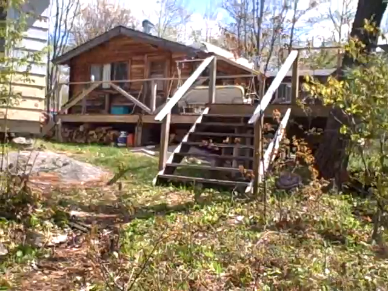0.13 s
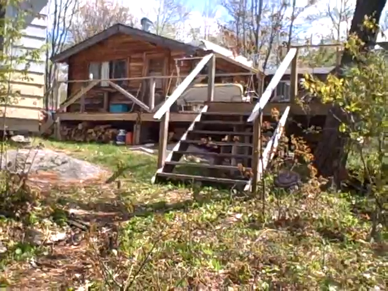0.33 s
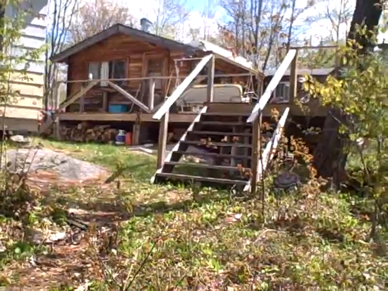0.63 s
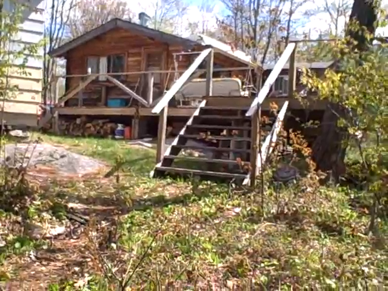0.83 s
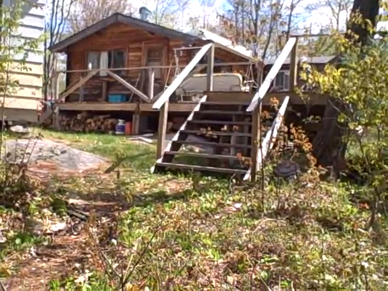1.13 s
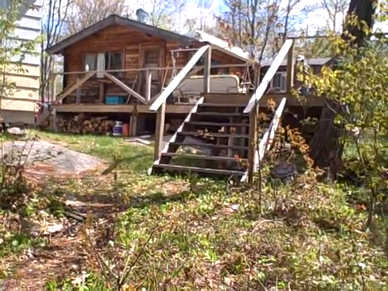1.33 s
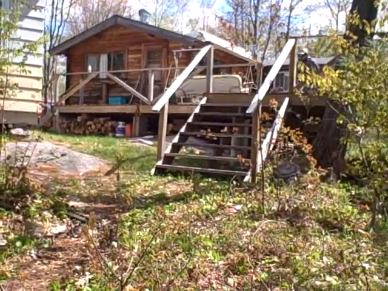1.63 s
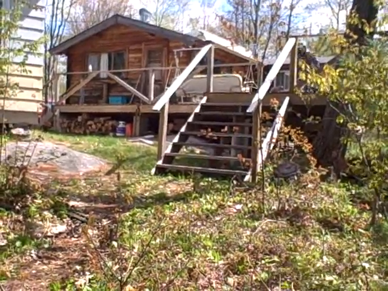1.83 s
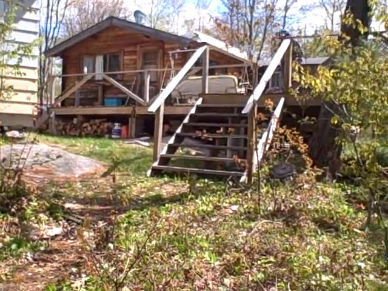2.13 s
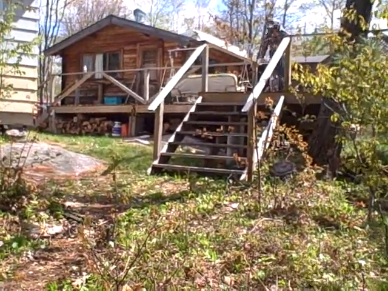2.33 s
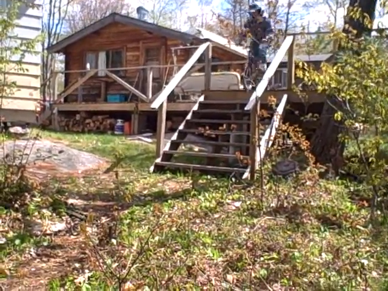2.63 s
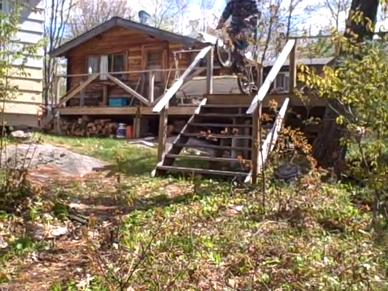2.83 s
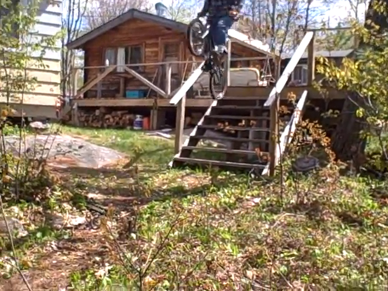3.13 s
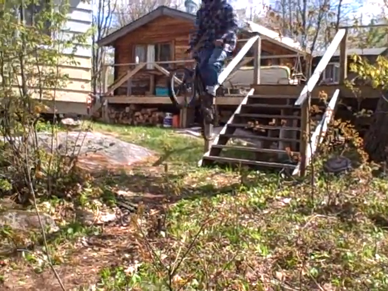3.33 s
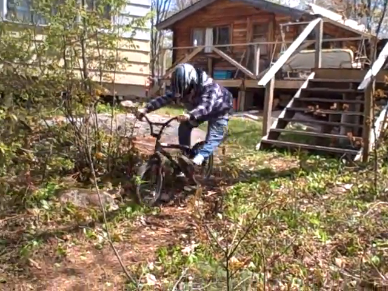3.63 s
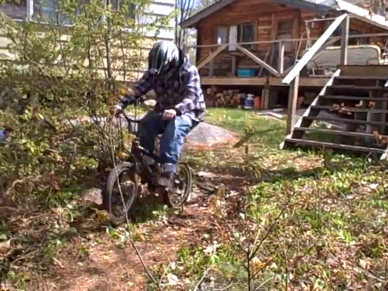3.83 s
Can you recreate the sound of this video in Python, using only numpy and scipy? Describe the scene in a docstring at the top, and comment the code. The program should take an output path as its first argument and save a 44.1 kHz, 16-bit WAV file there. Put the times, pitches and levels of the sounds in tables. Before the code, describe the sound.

A small bicycle rolls over a wooden deck some way off with hollow knocks. Its freewheel whirs briefly in the air, then it lands close by, chain clacking, and crunches through dry leaves. Light wind buffets the microphone outdoors.

```python
"""Outdoors, a wooden deck among trees. Wind buffets the microphone over rustling foliage and far birds.
A small bicycle rolls over the deck, its wheels knocking the boards into ringing, and jumps down the steps.
In the air its freewheel whirs with fast pawl ticks. Both tyres thump into dry leaves, the chain clacks
on the frame, and it rolls on, crunching. The yard returns short, dull echoes."""
import sys
import numpy as np
from scipy import signal
from scipy.fft import rfft, irfft, next_fast_len
from scipy.io import wavfile
from scipy.ndimage import uniform_filter1d

SR = 44100
rng = np.random.default_rng(int(sys.argv[2]) if len(sys.argv) > 2 else 0)


def wrap_up_sound(samples):
    """Save the sound to the file named by the first command line argument, as 16-bit audio."""
    columns = np.atleast_2d(samples).T
    # keep every value between -1 and 1, then stretch to whole-number steps
    tamed = np.clip(columns, -1, 1)
    steps = np.round(tamed * 32767).astype(np.int16)
    wavfile.write(sys.argv[1], SR, steps)


N = 176400
T = np.arange(N) / SR
EVENT_T = T[:SR // 2]


def amp(db):
    """Decibels to gain."""
    return 10 ** (np.asarray(db) / 20)


def unit(x):
    """Scale to rms 1."""
    return x / np.sqrt(np.mean(x ** 2) + 1e-20)


def level(points):
    """Gain curve from (time [s], level [dB]) points."""
    return amp(np.interp(T, *np.transpose(points)))


def add(mix, start_s, sound):
    """Mix a sound in at start_s."""
    part = mix[round(start_s * SR):][:len(sound)]
    part += sound[:len(part)]


def colour(x, spectrum, dull_db_oct=0):
    """Filter by a spectrum and a downward tilt; rms 1."""
    size = next_fast_len(len(x) + 4096)
    octave = np.log2(np.fft.rfftfreq(size, 1 / SR) + 1)
    hz, db = np.transpose(spectrum)
    tilt_db = dull_db_oct * np.maximum(octave, np.log2(hz[0]))
    gain = amp(np.interp(octave, np.log2(hz), db) - tilt_db)
    return unit(irfft(rfft(x, size) * gain / gain.max(), size)[:len(x)])


def hump(hz):
    """Spectrum of one broad resonance."""
    return [(hz / 10, -35), (hz / 2, -10), (hz, 0), (hz * 2, -16), (hz * 10, -50)]


def decay(t60_s):
    """Envelope falling 60 dB in t60_s."""
    return np.exp(-np.log(1000) * EVENT_T / t60_s)


def attack(rise_s):
    """Envelope rising to 1 with time constant rise_s."""
    return 1 - np.exp(-EVENT_T / rise_s)


def burst(spectrum, t60_s, dull_db_oct=0, rise_s=0.0003):
    """Coloured noise, fast rise, exponential decay."""
    noise = colour(rng.standard_normal(len(EVENT_T)), spectrum, dull_db_oct)
    return noise * attack(rise_s) * decay(t60_s)


def ring(modes, dull_db_oct=0):
    """Damped modes of alternating sign, tilted about the median frequency."""
    centre_hz = np.median([mode[0] for mode in modes])
    out = np.zeros(len(EVENT_T))
    for k, (hz, db, t60_s) in enumerate(modes):
        gain = (-1) ** k * amp(db - dull_db_oct * np.log2(hz / centre_hz))
        out += gain * decay(t60_s) * np.sin(2 * np.pi * hz * EVENT_T)
    return out


def flutter(samples, depth_db):
    """Random gain wandering over about the given number of samples."""
    drift = uniform_filter1d(uniform_filter1d(rng.standard_normal(N), samples), samples)
    return amp(depth_db * unit(drift))


def crackle(per_s, spread_db):
    """Random tiny snaps, a few larger than the rest; rms 1."""
    sizes = amp(spread_db * np.minimum(rng.exponential(1, N), 4))
    signs = rng.choice([-1, 1], N)
    return unit(sizes * signs * (rng.random(N) < per_s / SR))


# tree wash spectrum (frequency [Hz], level [dB])
TREE_SPECTRUM = [(59, -39), (100, 0.5), (163, -6.5), (266, -1), (350, -4), (433, -4.5), (492, -4.5),
                 (721, -2.5), (2470, -15), (6560, -23), (16000, -27.5)]


def trees():
    """Breeze in the trees: a soft, nearly steady wash."""
    return amp(-57.5) * colour(rng.standard_normal(N), TREE_SPECTRUM) * flutter(2500, depth_db=0.5)


# turbulence envelope (time [s], level [dB])
WIND_ENVELOPE = [(0, -46), (.27, -52.5), (.35, -43.5), (.58, -59), (1.03, -54), (1.25, -48), (1.34, -25),
                 (1.46, -45.5), (1.6, -45), (1.69, -31), (1.8, -40), (2.03, -41), (2.22, -47.5),
                 (2.58, -44.5), (2.8, -37.5), (2.92, -45), (3.03, -44), (3.14, -45), (3.22, -42.5),
                 (3.4, -46.5), (3.5, -37), (3.62, -44.5), (3.93, -39), (4, -36.5)]
# turbulence spectrum (frequency [Hz], level [dB])
WIND_SPECTRUM = [(10, -5.5), (30, 1.5), (55, -3.5), (110, -11), (180, -20), (300, -33.5), (700, -41.5),
                 (3000, -92)]
# single buffets (time [s], peak [dB], centre [Hz])
WIND_BUFFETS = [(0.339, -37.5, 101), (1.292, -39, 71), (1.32, -30, 76.6), (1.338, -34, 162),
                (1.35, -43, 61.3), (1.371, -32, 104), (1.4, -33, 154), (1.68, -37.5, 55),
                (1.6956, -26.5, 247), (1.714, -43, 51.4), (1.827, -35.5, 116), (2.545, -34.5, 49.7),
                (2.609, -35.5, 95), (2.769, -32, 121), (2.812, -30, 75), (3.515, -29, 50),
                (3.901, -30.5, 129), (3.93, -24, 73.6)]


def wind():
    """Low turbulence at the microphone, with single push-pull pressure pulses."""
    out = level(WIND_ENVELOPE) * colour(rng.standard_normal(N), WIND_SPECTRUM)
    lead_s = 0.05
    for time_s, db, hz in WIND_BUFFETS:
        phase = 2 * np.pi * hz * (T[:SR // 10] - lead_s)
        pulse = -phase * np.exp((1 - phase ** 2) / 2)
        add(out, time_s - lead_s, amp(db) * pulse)
    return out


# rustle envelope (time [s], level [dB])
RUSTLE_ENVELOPE = [(0, -70), (.25, -69), (.45, -76), (.56, -68), (.76, -60), (.95, -65.5), (1.1, -64),
                   (1.35, -70), (1.7, -76), (2.2, -67), (2.8, -67.5), (3.1, -74), (4, -73)]
# rustle spectrum (frequency [Hz], level [dB])
RUSTLE_SPECTRUM = [(300, -13), (1200, 11.5), (1900, 2.5), (3000, -2), (5500, -0.5), (9000, -9.5),
                   (16000, -6)]
# dry leaves stirring nearby (time [s], level [dB], t60 [s], centre [Hz])
LEAF_STIRS = [(.1, -61, 0.055, 11000), (.345, -60, 0.28, 1280), (.453, -50, 0.048, 1240),
              (.69, -67, .15, 11000), (1.29, -56, .025, 11800), (1.302, -61, .02, 9000),
              (1.438, -69, .03, 14000), (1.483, -61, 0.088, 11500), (1.904, -52, 0.043, 7100),
              (2.036, -59.5, 0.09, 11000), (3.44, -55, 0.055, 6500), (3.463, -52, .04, 7200)]


def foliage():
    """Leaves brush and tick together as the breeze swells; single dry ones stir nearby."""
    friction = crackle(per_s=900, spread_db=4) + 1.6 * rng.standard_normal(N)
    out = level(RUSTLE_ENVELOPE) * colour(friction * flutter(500, depth_db=2), RUSTLE_SPECTRUM)
    for time_s, db, t60_s, hz in LEAF_STIRS:
        add(out, time_s, amp(db) * burst(hump(hz), t60_s, rise_s=0.00051))
    return out


# far calls (time [s], length [s], pitch [Hz], level [dB])
BIRD_CALLS = [(0.743, 0.097, 6500, -71), (.75, 0.05, 2920, -64), (0.864, 0.061, 6500, -66.5),
              (.87, .05, 2830, -65), (1.36, 0.09, 5900, -74)]


def birds():
    """Faint far calls, blurred by echoes into narrow bands of noise."""
    out, t = np.zeros(N), T[:SR // 4]
    half_width_hz = 220
    for time_s, length_s, hz, db in BIRD_CALLS:
        band = [(hz / 2, -60), (hz - half_width_hz, -14), (hz, 0),
                (hz + half_width_hz, -14), (hz * 2, -60)]
        arch = np.sin(np.pi * np.minimum(t / length_s, 1))
        add(out, time_s, amp(db) * arch * colour(rng.standard_normal(len(t)), band))
    return out


# tyre rumble envelope (time [s], level [dB])
ROLL_ENVELOPE = [(0, -73), (1.65, -70), (1.88, -49), (2.03, -52), (2.17, -57.5), (2.28, -52.5), (2.42, -49),
                 (2.55, -58), (2.8, -53), (3, -71), (3.3, -96)]
# loose board spectrum (frequency [Hz], level [dB])
BOARD_SPECTRUM = [(100, -1), (230, -0.5), (330, 1), (480, -4), (700, -7.5), (1100, -14.5), (1500, -23),
                  (3000, -37), (8000, -58), (16000, -74)]
# wheel knocks (time [s], gain [dB], dullness [dB/octave])
WHEEL_KNOCKS = [(1.831, -24, 7.5), (1.915, -15, -1), (1.986, -13.5, 7), (2.018, -23, 17.5),
                (2.2975, 0, 0.5), (2.309, -5.5, -3.5), (2.345, -7.5, 5.5), (2.386, -12.5, -0.5),
                (2.465, -26, 13.5), (2.648, -19.5, 7.5), (2.76, -20, 4)]
# deck modes (frequency [Hz], level re knock [dB], t60 [s])
DECK_MODES = [(238.4, -42, 0.34), (300.6, -32.5, 0.31), (349.5, -36, .22), (363, -38.5, 0.32),
              (425, -40, 0.15), (567, -36, 0.13), (610, -40, 0.12), (686.5, -30, 0.079), (780, -38, 0.1),
              (954, -42, 0.078), (1080, -39, .1), (1700, -43, 0.072)]


def deck():
    """Tyres rumble over the deck; each knock rings its modes and clatters loose boards."""
    out = level(ROLL_ENVELOPE) * colour(rng.standard_normal(N), BOARD_SPECTRUM)
    out *= flutter(700, depth_db=-2)
    rise_s = 0.0008
    for time_s, db, dull_db_oct in WHEEL_KNOCKS:
        wood = ring(DECK_MODES, dull_db_oct) * attack(rise_s)
        clatter = burst(BOARD_SPECTRUM, t60_s=0.23, dull_db_oct=dull_db_oct, rise_s=rise_s)
        add(out, time_s, amp(db) * (wood + amp(-33.5) * clatter))
    return out


# distant bicycle clanks (time [s], level [dB], t60 [s], dullness [dB/octave])
BICYCLE_CLANKS = [(1.904, -49.5, 0.22, 6), (2.035, -58, 0.12, -8), (2.302, -54.5, 0.12, 2),
                  (2.646, -44.5, .22, 1), (2.769, -55, 0.11, -4.5), (2.833, -53, 0.082, -9)]
# clank spectrum (frequency [Hz], level [dB])
CLANK_SPECTRUM = [(200, -35), (600, -8), (1000, 1.5), (1400, -3), (2000, 0.5), (3500, -4.5), (6000, -8.5),
                  (9000, -21), (16000, -20)]


def clanks():
    """The bicycle clanks as it crosses the deck."""
    out = np.zeros(N)
    for time_s, db, t60_s, dull_db_oct in BICYCLE_CLANKS:
        add(out, time_s, amp(db) * burst(CLANK_SPECTRUM, t60_s, dull_db_oct, rise_s=0.00032))
    return out


# freewheel envelope (time [s], level [dB])
WHIR_ENVELOPE = [(3.1, -81), (3.18, -61.5), (3.27, -52), (3.35, -55.5), (3.47, -50.5), (3.54, -55),
                 (4, -66)]
# freewheel spectrum (frequency [Hz], level [dB])
WHIR_SPECTRUM = [(400, -18), (1500, -6), (3000, -5), (4400, 1), (7000, 0.5), (10000, 0), (13000, 2),
                 (15300, 7.5), (16000, -4.5)]


def freewheel():
    """Fast, uneven pawl ticks blur with the hiss of spinning wheels."""
    pawl_hz = 443 * flutter(200, depth_db=3.5)
    teeth_passed = np.floor(np.cumsum(pawl_hz) / SR)
    ticks = np.diff(teeth_passed, prepend=0) * rng.exponential(1, N)
    return level(WHIR_ENVELOPE) * colour(0.5 * unit(ticks) + rng.standard_normal(N), WHIR_SPECTRUM)


# chain and frame clacks (time [s], level [dB], t60 [s], dullness [dB/octave])
CHAIN_CLACKS = [(3.4997, -37.5, 0.0095, -2), (3.5275, -29.5, 0.011, -9), (3.622, -25.5, 0.0059, 7),
                (3.678, -29, 0.0086, 5), (3.7282, -12.5, 0.0097, -0.5), (3.7315, -22, 0.016, -2.5),
                (3.742, -21, 0.0078, -1.5), (3.774, -29, 0.0049, 0), (3.786, -37, .008, -9),
                (3.82, -24, 0.0047, 0), (3.8876, -28.5, 0.0095, 6)]
# clack spectrum (frequency [Hz], level [dB])
CLACK_SPECTRUM = [(300, -35), (800, 4), (1250, -10), (1620, 11.5), (1900, -11), (2700, 4.5), (3500, -3),
                  (5500, 3), (7200, 4.5), (9500, 1.5), (12700, 2), (15500, 6), (17000, -3)]
# frame modes (frequency [Hz], level re clack [dB], t60 [s])
FRAME_MODES = [(1630, -28, 0.033), (2110, -23, 0.024), (2700, -34, 0.046), (4965, -29, 0.11),
               (7070, -25, .15)]


def chain_slap():
    """Chain and fittings slap the frame, which rings briefly."""
    out = np.zeros(N)
    for time_s, db, t60_s, dull_db_oct in CHAIN_CLACKS:
        slap = burst(CLACK_SPECTRUM, t60_s, dull_db_oct, rise_s=0.00015)
        add(out, time_s, amp(db) * (slap + ring(FRAME_MODES)))
    return out


# tyre impacts (time [s], thump [dB], pitch [Hz], t60 [s], rise [s], dirt [dB], dirt t60 [s])
TYRE_IMPACTS = [(3.5551, -23.5, 136.4, 0.061, 0.0032, -32.5, 0.14),
                (3.6212, -22, 194, 0.021, 0.014, -28.5, 0.091)]
# dirt spray spectrum (frequency [Hz], level [dB])
DIRT_SPECTRUM = [(80, -7), (300, 7), (500, -4), (750, 4), (1200, -5), (2700, -4), (4000, -7.5),
                 (7500, -6.5), (11000, -12), (16000, -13.5)]
# bumps over the ground (time [s], level [dB], t60 [s], centre [Hz])
GROUND_BUMPS = [(3.625, -22, 0.037, 250), (3.667, -38, 0.03, 740), (3.768, -40, 0.11, 443),
                (3.821, -36, 0.03, 770), (3.859, -44, .05, 220), (3.885, -42, 0.045, 644),
                (3.896, -36, 0.16, 140), (3.992, -37.5, .1, 940)]


def landing():
    """Each tyre thumps down and sprays dirt; dull bumps follow."""
    out = np.zeros(N)
    for time_s, thump_db, hz, t60_s, rise_s, dirt_db, dirt_t60_s in TYRE_IMPACTS:
        envelope = (1 - np.exp(-(EVENT_T / rise_s) ** 2)) * decay(t60_s)
        thump = envelope / envelope.max() * np.sin(2 * np.pi * hz * EVENT_T)
        add(out, time_s, amp(thump_db) * thump + amp(dirt_db) * burst(DIRT_SPECTRUM, dirt_t60_s))
    for time_s, db, t60_s, hz in GROUND_BUMPS:
        add(out, time_s, amp(db) * burst(hump(hz), t60_s, rise_s=0.0018))
    return out


# leaf crunch envelope (time [s], level [dB])
CRUNCH_ENVELOPE = [(3.55, -80), (3.572, -70), (3.603, -42), (3.618, -51), (3.63, -34), (3.648, -31),
                   (3.68, -34), (3.72, -39.5), (3.748, -35.5), (3.778, -32.5), (3.808, -39.5),
                   (3.83, -38.5), (3.853, -40), (3.871, -33), (3.9, -40.5), (3.96, -43.5), (3.985, -38.5),
                   (4, -40.5)]
# leaf crunch spectrum (frequency [Hz], level [dB])
CRUNCH_SPECTRUM = [(150, 6), (400, 0.5), (750, 2.5), (1200, -1.5), (1800, 0.5), (2700, 1.5), (3300, 1),
                   (5000, 3), (7200, 2.5), (10500, -1), (13000, -0.5), (15400, 2.5), (16000, -7)]


def leaf_crunch():
    """Dry leaves under the tyres: clumps of tiny snaps over a brushing hiss."""
    snaps_and_hiss = crackle(per_s=5000, spread_db=2) + 0.56 * rng.standard_normal(N)
    clumps = snaps_and_hiss * flutter(130, depth_db=1.9)
    on_ground = T > CRUNCH_ENVELOPE[0][0]
    return level(CRUNCH_ENVELOPE) * on_ground * colour(clumps, CRUNCH_SPECTRUM)


def yard_echoes(x):
    """Sparse, dull reflections from walls and trees."""
    taps_per_s, predelay_s = 1500, 0.012
    taps = rng.standard_normal(len(EVENT_T)) * (rng.random(len(EVENT_T)) < taps_per_s / SR)
    tail = colour(taps, [(100, 5), (700, 2), (4000, -6), (16000, -3.5)])
    tail *= (EVENT_T > predelay_s) * decay(t60_s=0.27)
    return signal.fftconvolve(x, tail / np.linalg.norm(tail))[:N]


def scene():
    """Mono mix: ambience, far deck, near landing; the far sounds echo more."""
    ambience = trees() + wind() + foliage() + birds()
    far = deck() + clanks()
    near = freewheel() + chain_slap() + landing() + leaf_crunch()
    echoes = yard_echoes(amp(-13) * far + amp(-19) * near)
    return (ambience + far + near + echoes)[None]


def record(dry):
    """The microphone opens; a steep low-pass limits the band."""
    start_s, fade_s, cutoff_hz = 0.038, 0.0033, 16000
    opened = dry * np.clip((T - start_s) / fade_s, 0, 1)
    lowpass = signal.firwin(401, cutoff_hz, window=("kaiser", 8), fs=SR)
    return signal.oaconvolve(opened, lowpass[None], "same")


dry = scene()
out = record(dry)
wrap_up_sound(out)
```